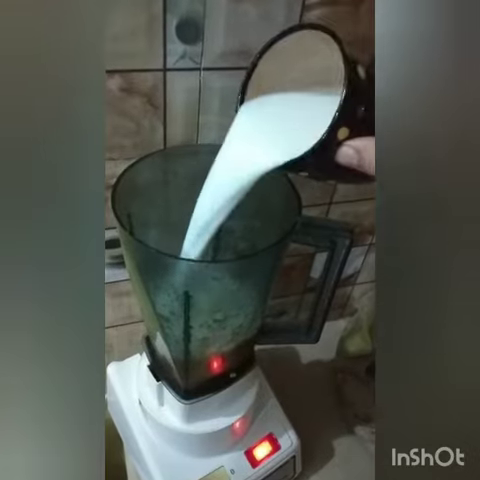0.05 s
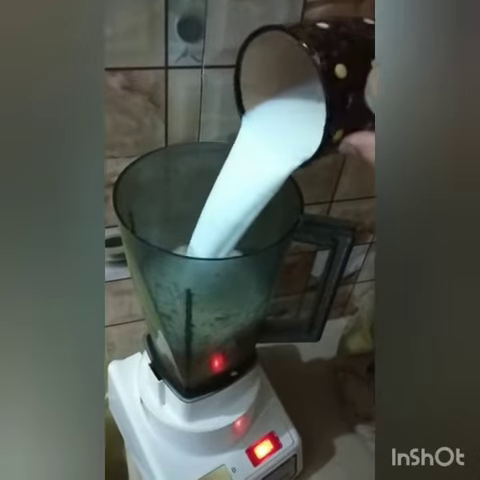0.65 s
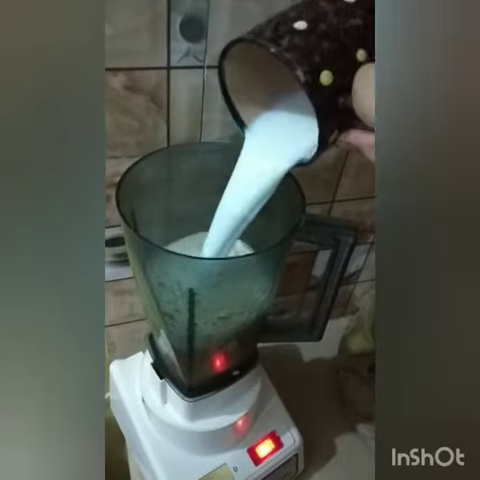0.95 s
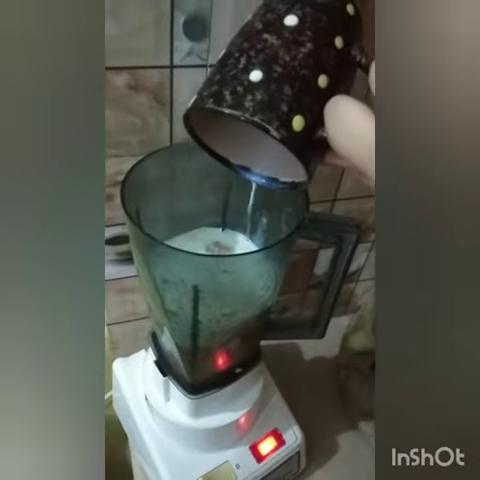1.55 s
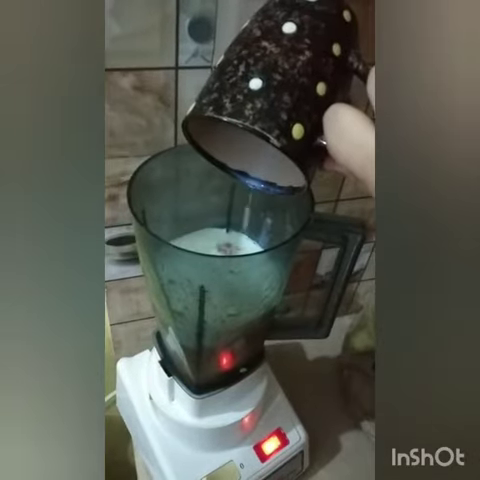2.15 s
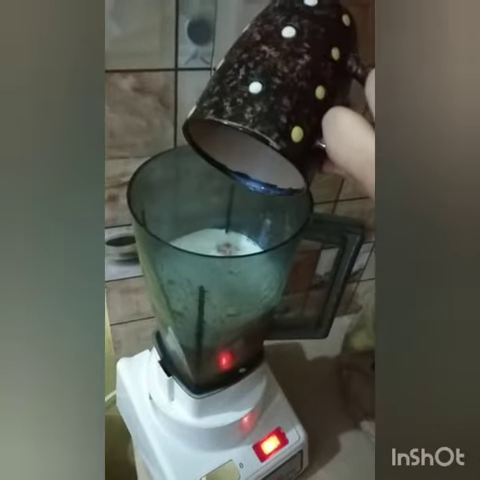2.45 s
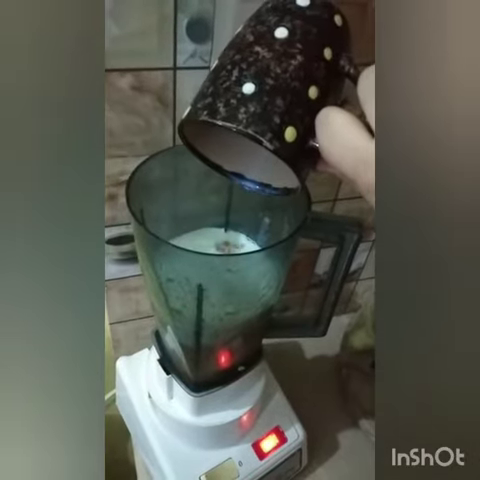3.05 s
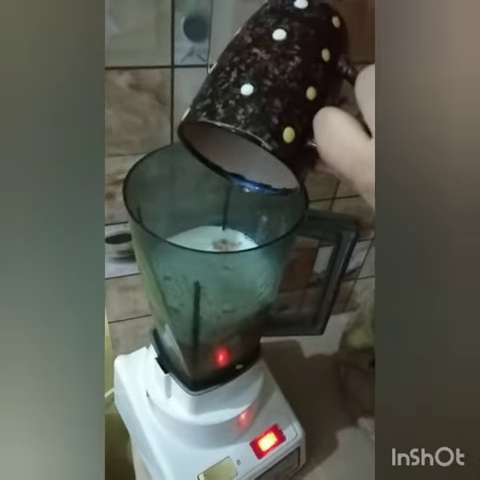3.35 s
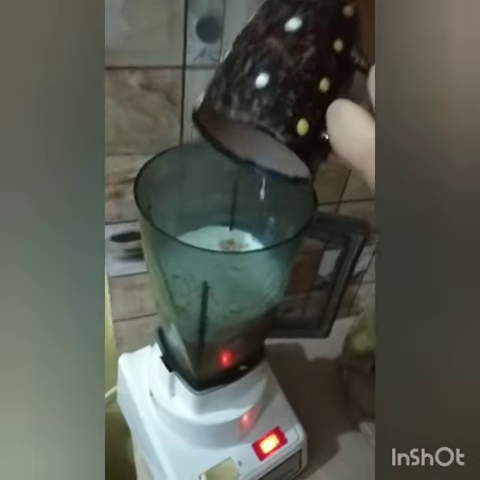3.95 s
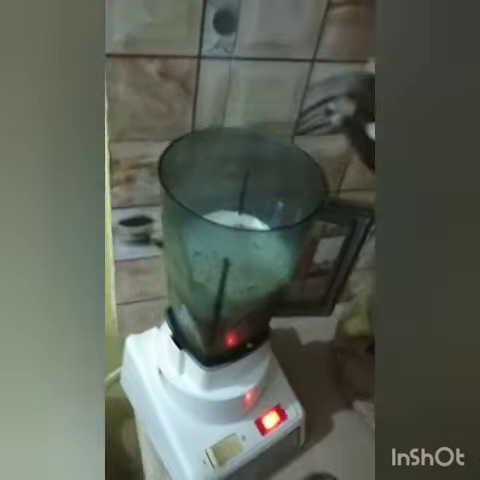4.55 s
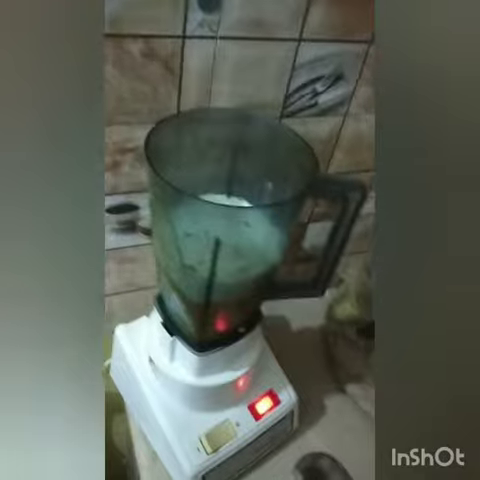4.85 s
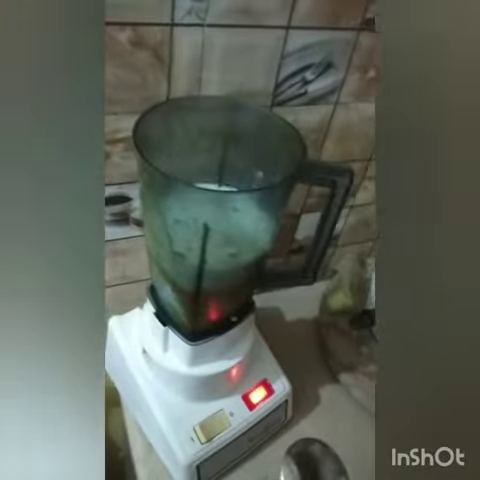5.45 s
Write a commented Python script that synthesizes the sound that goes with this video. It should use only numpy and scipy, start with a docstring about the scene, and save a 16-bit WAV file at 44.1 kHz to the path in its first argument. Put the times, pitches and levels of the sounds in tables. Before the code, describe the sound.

Heard from just above a plastic blender jar in a tiled kitchen, milk gurgles and spatters softly, rising in pitch as the stream dwindles. Then a mug strikes the jar twice with sharp clicks and a hollow note, followed by brief scuffs of a hand. Over everything a shrill cricket chirps about ten times a second, with a steady appliance hum and room rumble underneath.

```python
"""Milk slides quietly from a mug into a plastic blender jar, bubbling and setting the hollow jar ringing.
A hand-held stereo microphone hears it from above the jar, in a tiled kitchen where a cricket scrapes
its wings about ten times a second. The mug knocks the jar as the last drops are shaken off, and a hand
scuffs, squeaks and rustles now and then. Under it all an appliance hums and the room rumbles."""
import sys
import numpy as np
from scipy import signal
from scipy.fft import rfft, irfft
from scipy.io import wavfile
from scipy.ndimage import uniform_filter1d, map_coordinates

SR = 44100
rng = np.random.default_rng(int(sys.argv[2]) if len(sys.argv) > 2 else 0)


def output_pcm(signal):
    """Save a mono or channel-first signal as 16-bit PCM at the path in sys.argv[1].

    Samples are clipped to [-1, 1] before scaling.
    """
    pcm = np.clip(np.atleast_2d(signal).T, -1, 1) * 32767
    wavfile.write(sys.argv[1], SR, np.round(pcm).astype(np.int16))


N = 250929
TIME = np.arange(N) / SR
BINS = np.maximum(np.arange(N // 2 + 1) * SR / N, 1)   # f/Hz

# spectrum of milk spattering: f/Hz, density/dB
SPATTER_SPECTRUM = [(1200, -5.5), (2200, -1), (3000, -8), (3500, 0.5), (4200, 0.5), (4550, -8), (5000, -1),
                    (5700, -3.5), (6500, -5), (9000, -21)]


def from_db(db):
    """Decibels to gain."""
    return 10 ** (np.asarray(db) / 20)


def rms_one(x):
    """Scale to unit rms."""
    return x / np.sqrt(np.mean(x ** 2) + 1e-20)


def steady(x):
    """Hold the rms near 1 over every half second."""
    return x / np.sqrt(uniform_filter1d(x ** 2, SR // 2, axis=-1) + 1e-12)


def in_time(rows):
    """The columns of a curve at every sample."""
    s, *columns = np.transpose(rows)
    return [np.interp(TIME, s, c) for c in columns]


def at_hz(points, hz):
    """Read a spectrum on a log-frequency axis."""
    f, value = np.transpose(points)
    return np.interp(np.log(hz), np.log(f), value)


def colour(x, spectrum):
    """Give a signal a spectrum; unit rms."""
    return rms_one(irfft(rfft(x) * from_db(at_hz(spectrum, BINS)), N))


def pan(left_db):
    """Gains of the two channels, the left louder by left_db."""
    return from_db(np.array([[.5], [-.5]]) * left_db)


def arch(start, length):
    """A half-sine swell; times in seconds."""
    return np.sin(np.pi * np.clip((TIME - start) / length, 0, 1))


def ring(clicks, hz, t60):
    """A unit click sets a sine of height 1 ringing."""
    r, w = from_db(-60 / (t60 * SR)), 2 * np.pi * hz / SR
    return signal.lfilter([0, np.sin(w)], [1, -2 * r * np.cos(w), r * r], clicks + 1e-18)


def singing(hz, t60):
    """A resonance kept ringing by random excitation; unit rms."""
    return steady(ring(rng.standard_normal(N + SR), hz, t60)[SR:])


def grains(spectrum, grain_db):
    """A dense spray of tiny ticks, more uneven as grain_db rises."""
    noise = rng.standard_normal((2, N))
    sizes = from_db(grain_db * np.minimum(rng.exponential(1, N), 4))
    return colour(noise * sizes, spectrum)


def diffuse(spectrum):
    """Noise from all around: alike at both microphones in the bass, unrelated in the treble."""
    # likeness of the two channels: f/Hz, correlation
    likeness = [(30, 0.82), (100, 0.95), (280, 0.86), (450, 0.74), (700, -0.082), (1500, -0.12),
                (4000, 0.036), (15000, -0.15)]
    # balance of the room: f/Hz, left minus right/dB
    lean = [(60, 0), (110, 2.5), (200, -6), (380, 4.5), (700, 1.5), (1290, 2), (2380, 1), (4400, 4.5),
            (8120, 7), (15000, 5)]
    mid, side = rfft(rng.standard_normal((2, N)))
    alike = np.clip(at_hz(likeness, BINS), -1, 1)
    both = np.sqrt(1 + alike) * mid + np.sqrt(1 - alike) * side * [[1], [-1]]
    return colour(irfft(both * pan(at_hz(lean, BINS)), N), spectrum)


def tiles(x, walls_db, sway_s=.00008):
    """Add early reflections, reaching each microphone by slightly different paths."""
    # reflections off the tiles: delay/s, relative level/dB
    echoes = [(.0048, -0.5), (.0092, 2.5), (0.014, -2.5), (0.017, -7.5), (.0225, -9.5), (0.034, -3),
              (.048, -4)]
    heard, t = np.array([x, x]), np.arange(len(x)) / SR
    for delay, echo_db in echoes:
        for side, detour_s in zip(heard, (1e-4, 1e-3)):
            path_s = delay + detour_s * rng.uniform(-1.002, 1)
            # the hand-held microphone sways, so each path slowly changes length
            sway = sway_s * np.sin(np.pi * t / 2 + rng.uniform(0, 2 * np.pi))
            side += from_db(echo_db + walls_db) * map_coordinates(x, [(t - path_s - sway) * SR], order=3)
    return heard


def kitchen(x, wet_db):
    """Add a diffuse tail in which each band dies at its own rate."""
    # reverberation of the kitchen: f/Hz, t60/s
    decay = [(300, 0.085), (3000, 0.77), (7300, 0.67), (14500, 0.04)]
    t, tail = TIME[:SR // 2], 0
    edges_hz = [60, 1000, 4000, 10000, 18000]
    for low, high in zip(edges_hz, edges_hz[1:]):
        bandpass = signal.butter(2, [low, high], "band", fs=SR, output="sos")
        band = signal.sosfilt(bandpass, rng.standard_normal((2, len(t))))
        tail = tail + band * from_db(-60 * t / at_hz(decay, np.sqrt(low * high)))
    tail = rms_one(tail) / np.sqrt(len(t))
    return x + from_db(wet_db) * signal.fftconvolve(x, tail, axes=1)[:, :x.shape[1]]


def milk(bubbles_per_s=400, spread=.42, t60_cycles=14):
    """The stream folds in bubbles, deep as it plunges, higher as it thins to a thread; it spatters too."""
    # course of the pour: t/s, level/dB, typical bubble f/Hz
    pour = [(0, -41, 543), (.5, -58, 370), (.58, -42.5, 228.3), (1.0, -48.5, 327), (1.3, -53, 870),
            (2.6, -50.5, 987), (3.0, -58, 985)]
    level_db, pitch = in_time(pour)
    births = (rng.random(N) < bubbles_per_s / SR) * rng.standard_normal(N)
    log_pitch = np.log(pitch) + spread * rng.standard_normal(N)
    pitches = np.geomspace(110, 1150, 16)
    slot = np.searchsorted(np.log(pitches), log_pitch)
    bubbles = sum(ring(births * (slot == k), hz, t60_cycles / hz) * np.sqrt(hz)
                  for k, hz in enumerate(pitches))
    direct = pan(0.82) * from_db(level_db) * rms_one(bubbles) + pan(9.4) * splashes()
    return kitchen(direct, wet_db=3.0)


def splashes(rise_db_per_s=26, fall_db_per_s=94):
    """Fine spatter swells and dies away as the stream lands, narrows and breaks up."""
    # crests of the spatter: t/s, level/dB
    crests = [(.02, -44), (1.08, -51), (1.92, -46)]
    swell = sum(from_db(db - np.maximum(rise_db_per_s * (s - TIME), fall_db_per_s * (TIME - s)))
                for s, db in crests)
    return swell * grains(SPATTER_SPECTRUM, grain_db=0.0)


def room_tone(rumble_db=0.57, hiss_db=-39, hum_db=-1, hum_width_hz=7):
    """A swelling low rumble, steady hiss and the wavering hum of an appliance."""
    # swell of the rumble: t/s, level/dB
    rumble_curve = [(0.0, -40), (0.76, -38), (1.8, -38.5), (2.2, -36.5), (2.7, -35.5), (3.65, -36.5),
                    (4.3, -36.5), (4.48, -39), (5.5, -40), (5.69, -37.5)]
    # spectra of the rumble and the hiss: f/Hz, density/dB
    rumble_spectrum = [(30, -41), (70, -7.5), (110, 2), (175, -4), (250, 1.5), (310, 5.5), (355, 0.5),
                       (410, 0), (520, -1), (620, -5.5), (900, -4), (2000, -40.5)]
    hiss_spectrum = [(15, -14), (26, 11.5), (38, 1), (58, 5.5), (85, -8), (600, -4), (980, 1.5), (1300, -2),
                     (2400, -3.5), (3000, -7), (5500, -12.5), (8500, -30), (11000, -16.5), (16000, -30)]
    # tones of the appliance: f/Hz, level/dB, dB gained per dB of rumble
    hum_tones = [(50, -57.5, -1), (113, -50, 1.65), (131.8, -53.5, 2.5), (202, -49.5, 1), (225, -49, 0.5),
                 (279.7, -47, 2.5), (295, -49.5, 2), (398.4, -48.5, 2), (455.2, -52, 1.6),
                 (691.6, -54.5, 1)]
    rumble_level, = in_time(rumble_curve)
    swell_db = rumble_level - rumble_level.mean()
    hum = 0
    for hz, db, follows in hum_tones:
        narrow_band = rfft(rng.standard_normal(N)) / (1 + ((BINS - hz) / hum_width_hz) ** 2)
        hum = hum + from_db(hum_db + db + follows * swell_db) * rms_one(irfft(narrow_band, N))
    rumble = from_db(rumble_level + rumble_db) * diffuse(rumble_spectrum)
    return hum + rumble + from_db(hiss_db) * diffuse(hiss_spectrum)


def mug_rub(left_db=4):
    """A light scrape draws a thin, pitched ring from the mug."""
    # partials of the mug: f/Hz, relative level/dB, t60/s
    partials = [(3499, 1, 0.7), (4175, 0, 0.53), (4884, 1.5, .5), (5588, 0, .4), (6300, -2.5, .3)]
    # course of the scrape: t/s, level/dB
    scrape = [(0, -39), (.07, -46), (.18, -44), (.28, -59), (.4, -100)]
    sides = [sum(from_db(db) * singing(hz, t60) for hz, db, t60 in partials) for _ in range(2)]
    return from_db(in_time(scrape)[0]) * pan(left_db) * rms_one(np.array(sides))


def chirp_times(first_s=.06277, period_s=.103785):
    """The cricket's even beat, already under way, pushed and held back a little."""
    # drift around the beat: t/s, lag/s
    drift = [(0.06, 0.01), (0.17, 0.015), (0.27, 0.0182), (0.58, 0.0049), (0.89, 0.0044), (1.31, -0.014),
             (1.83, -0.00042), (2.24, -0.00011), (2.4, 0.004), (2.97, -0.017), (3.18, -0.012),
             (3.49, -0.017), (3.8, -0.0185), (4.01, -0.012), (4.11, -0.00014), (4.42, 0.014), (4.84, 0.018),
             (5.36, 0.0062), (5.67, 0.00051)]
    beats = np.arange(first_s - 2 * period_s, N / SR, period_s)
    return beats + np.interp(beats, *np.transpose(drift))


def wing_strokes(lead, scatter_hz=25, tooth_hz=110, uneven_db=0.56, jitter_s=.0001, note_lag_s=.0015):
    """Three strokes a chirp, falling in pitch as the scraper slows along the file: note and octave."""
    # strokes: t/s from the chirp's peak, length/s, start f/Hz, end f/Hz, note level/dB, octave level/dB
    strokes = [(-.0475, 0.0072, 7100, 6900, -2.5, 2.5), (-.0345, 0.0096, 7592, 6890, 3.5, 8),
               (-.018, 0.0124, 7700, 6790, 7.5, 7)]
    note, octave = np.zeros((2, N + 2 * lead))
    # uneven teeth roughen the pitch
    teeth = rms_one(uniform_filter1d(rng.standard_normal(len(note)), SR // 2000))
    for s in chirp_times():
        for offset, length, start_hz, end_hz, note_db, octave_db in strokes:
            late, sharp, strong = rng.standard_normal(3)
            progress = np.arange(int(length * SR)) / (length * SR)
            at = lead + int((s + offset + jitter_s * late) * SR) + np.arange(len(progress))
            glide_hz = start_hz + (end_hz - start_hz) * np.sin(np.pi / 2 * progress ** 0.93) ** 2
            phase = 2 * np.pi * np.cumsum(glide_hz + scatter_hz * sharp + tooth_hz * teeth[at]) / SR
            force = from_db(uneven_db * strong)
            swell = np.sin(np.pi * progress ** 0.78)
            note[at + int(note_lag_s * SR)] += from_db(note_db) * force * swell ** 1.7 * np.sin(phase)
            octave[at] += from_db(octave_db) * force * swell ** 1.2 * np.sin(2 * phase)
    return note, octave


def cricket(note_db=-3.0, octave_db=-22.0, left_db=7):
    """The wing's note reaches the microphone mostly by the walls; its octave beams more directly."""
    # the wing's resonance, and its second one an octave up: f/Hz, gain/dB
    wing = [(6200, -8), (6700, 6), (7000, -1.5), (7200, 0), (7400, 1), (7570, 4.5), (7750, -1), (8200, 3.5),
            (8600, -41)]
    wing_octave = [(12800, -22), (13500, 0), (14000, 1), (14800, -7), (15200, 1), (16000, -16)]
    # loudness of the song: t/s, level/dB
    loudness = [(0, -26.5), (3.4, -27), (3.9, -26.5), (4.43, -26.5), (4.93, -27.5), (5.2, -26.5)]
    lead = int(.3 * SR)   # earlier chirps still ring in the room
    note, octave = wing_strokes(lead)
    note = kitchen(tiles(note, walls_db=4.0), wet_db=-5.0)[:, lead:lead + N]
    octave = kitchen(tiles(octave, walls_db=-9.5), wet_db=4)[:, lead:lead + N]
    song = from_db(note_db) * steady(colour(note, wing))
    song += from_db(octave_db) * steady(colour(octave, wing_octave))
    return from_db(in_time(loudness)[0]) * pan(left_db) * song


def scuffs(left_db=11):
    """Skin slips in a short, bright spray of tiny catches."""
    # slips of the hand: t/s, length/s, level/dB
    slips = [(0.011, 0.086, -36), (0.083, 0.072, -41.5), (1.162, 0.014, -32.5), (2.198, 0.037, -42.5),
             (4.145, 0.024, -42), (4.31, 0.071, -32), (4.376, 0.0042, -33), (5.334, 0.03, -43),
             (5.396, 0.024, -32.5), (5.407, 0.043, -28), (5.46, 0.039, -44)]
    # spectrum of slipping skin: f/Hz, density/dB
    spectrum = [(2000, -26), (4500, -8), (5500, 4), (6500, -9), (8200, 1.5), (9500, 10), (11500, 2.5),
                (13000, 2), (16000, 6.5)]
    rub = sum(from_db(db) * arch(s, length) for s, length, db in slips)
    return kitchen(pan(left_db) * rub * grains(spectrum, grain_db=5.5), wet_db=-18.0)


def gurgles(attack_s=0.016, release_s=0.086, t60=0.54):
    """The stream sets one hollow resonance of the jar after another ringing."""
    # notes of the filling jar: t/s, length/s, f/Hz, level/dB
    notes = [(0.028, 0.17, 380, -45.5), (0.566, 0.15, 116.4, -39.5), (0.58, 0.078, 298, -39.5),
             (.62, 0.075, 410, -47), (0.756, 0.16, 296, -37.5), (0.799, 0.14, 112.4, -45.5),
             (0.86, 0.08, 475, -41), (1.02, 0.31, 1093, -50.5), (1.173, 0.396, 228, -47),
             (1.355, 0.16, 1056, -46.5), (1.45, .3, 770, -50), (1.819, 0.17, 929, -44),
             (2.048, 0.51, 1100, -53)]
    hollow = 0
    for s, length, hz, db in notes:
        held = np.clip(np.minimum((TIME - s) / attack_s, (s + length - TIME) / release_s + .5), 0, 1)
        hollow = hollow + from_db(db) * held * singing(hz, t60)
    return pan(0) * hollow


def squeaks(t60=0.027, left_db=7):
    """A fingertip sticks and slips on the glaze for a moment at one rough pitch."""
    # slips of the fingertip: t/s, length/s, f/Hz, level/dB
    slips = [(.15, .045, 5330, -51), (4.339, 0.031, 5420, -45), (5.403, .032, 5440, -50)]
    return pan(left_db) * sum(from_db(db) * arch(s, length) * singing(hz, t60)
                              for s, length, hz, db in slips)


def drips(t60=0.02, splat_s=.006, splat_db=-9, left_db=3):
    """A drop lands with a tiny splat and a quickly damped bubble."""
    # single drops: t/s, f/Hz, level/dB
    drops = [(1.277, 5080, -33), (1.498, 2130, -29.5)]
    pings = sum(ring(from_db(db) * (np.arange(N) == int(s * SR)), hz, t60) for s, hz, db in drops)
    fades = sum(from_db(db + splat_db) * (TIME > s) * np.exp(-np.abs(TIME - s) / splat_s)
                for s, _, db in drops)
    splats = fades * grains(SPATTER_SPECTRUM, grain_db=1.0)
    return kitchen(pan(left_db) * (pings + splats), wet_db=-11)


def rustles(left_db=5):
    """The hands shift with a dull, soft rubbing that swells and fades."""
    # shifts of the hands: crest t/s, length/s, level/dB
    shifts = [(2.944, 0.5, -43), (3.85, 1, -46), (5.625, 0.14, -36.5)]
    # spectrum of the rubbing: f/Hz, density/dB
    spectrum = [(500, -20), (1200, 8.5), (2200, 3), (3700, 9), (5500, 7), (9000, -19)]
    rub = sum(from_db(db) * arch(s - length / 2, length) for s, length, db in shifts)
    return pan(left_db) * rub * grains(spectrum, grain_db=-0.5)


def struck(hits, modes):
    """Blows set a set of modes ringing, alternate ones in opposite phase."""
    return sum(ring(hits, hz, t60) * from_db(db) * (-1) ** k for k, (hz, db, t60) in enumerate(modes))


def knocks(rise_s=0.0013, decay_s=.008, body_left_db=3, click_left_db=7):
    """The mug hits the jar: a sharp click and the short ping of the rim, then the jar's hollow note."""
    # contacts, the main knock a quick double: t/s, click level/dB, rim level/dB, body level/dB
    contacts = [(3.645, -24.5, -31, -31.5), (4.0535, -22.5, -25, -36), (4.057, -27, -29.5, -21),
                (4.227, -57, -57, -29)]
    # modes of the jar's body and of its rim: f/Hz, relative level/dB, t60/s
    body_modes = [(132, -11, 0.091), (242, -8, 0.11), (353, -11, 0.1), (470.3, -2, 0.042), (540, -1, 0.095),
                  (670, -5.5, 0.06)]
    rim_modes = [(2540, -19, 0.029), (3264, -7, 0.038), (3870, -3.5, 0.055), (5400, 1, 0.024),
                 (6100, -3, 0.018)]
    # spectrum of the click: f/Hz, density/dB
    click_spectrum = [(500, -21), (1400, 2), (2500, 11), (5500, 11.5), (8000, 5), (12000, 2.5), (16000, -9)]
    rim_hits, body_hits, bursts = np.zeros((3, N))
    for s, click_db, rim_db, body_db in contacts:
        rim_hits[int(s * SR)], body_hits[int(s * SR)] = from_db(rim_db), from_db(body_db)
        age = np.maximum(TIME - s, 0)
        bursts += from_db(click_db) * (1 - np.exp(-age / rise_s)) * np.exp(-age / decay_s)
    clicks = from_db(-1.5) * bursts * colour(rng.standard_normal((2, N)), click_spectrum)
    body, rim = struck(body_hits, body_modes), struck(rim_hits, rim_modes)
    return kitchen(pan(body_left_db) * body + pan(click_left_db) * (rim + clicks), wet_db=-14)


def scene():
    """Everything heard from above the jar."""
    return (cricket() + milk() + drips() + gurgles() + knocks() + mug_rub()
            + scuffs() + squeaks() + room_tone() + rustles())


def record(dry, cutoff_hz=15450):
    """The recorder cuts the top treble steeply."""
    return signal.sosfilt(signal.ellip(10, .1, 90, cutoff_hz, fs=SR, output="sos"), dry)


dry = scene()
out = record(dry)
output_pcm(out)
```